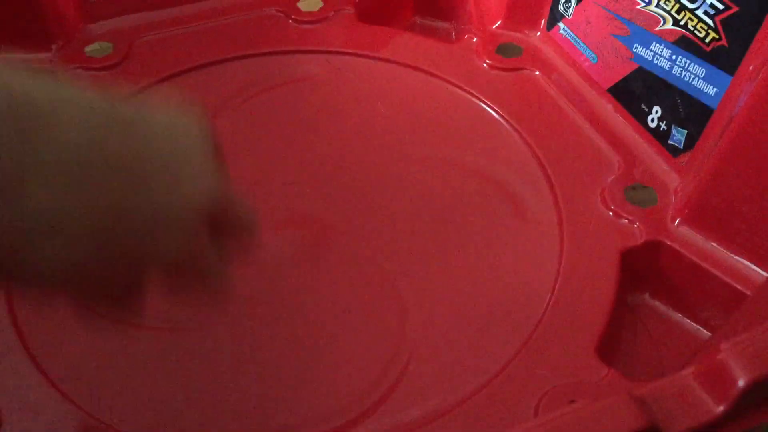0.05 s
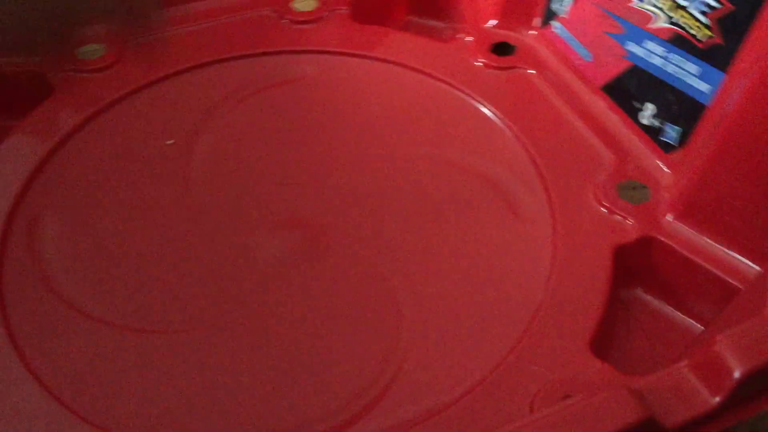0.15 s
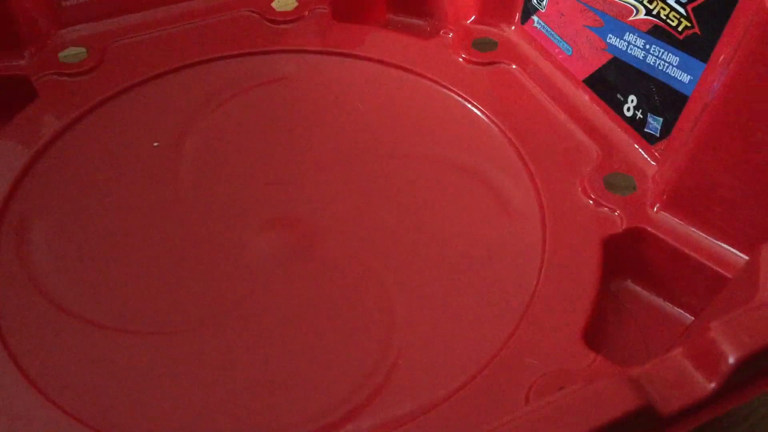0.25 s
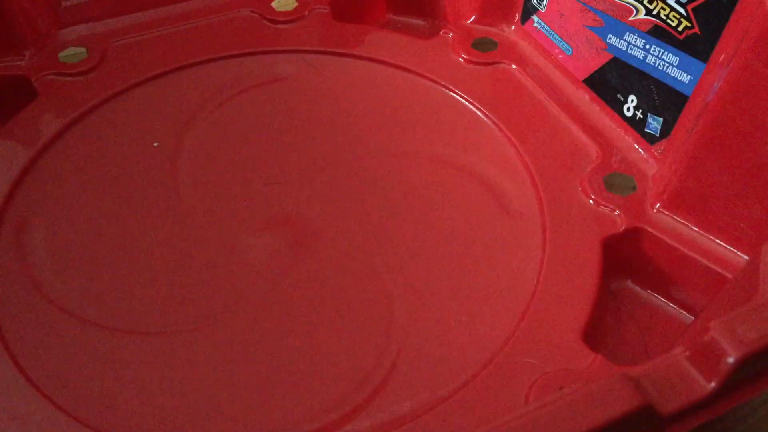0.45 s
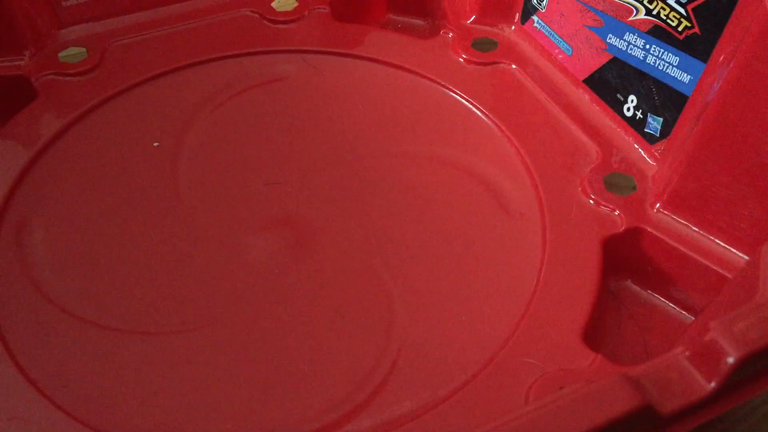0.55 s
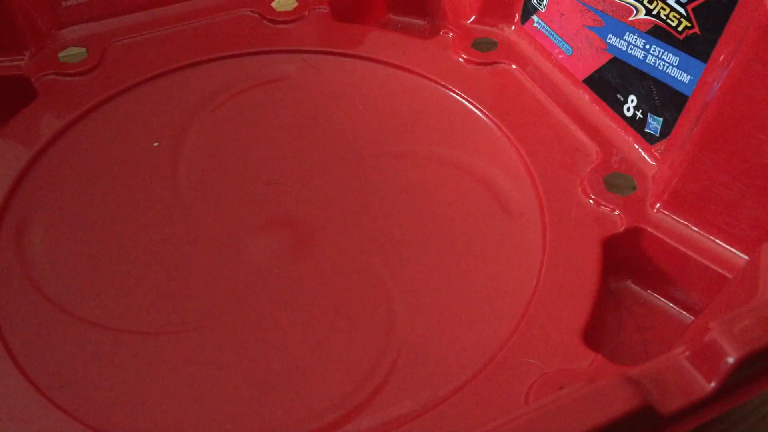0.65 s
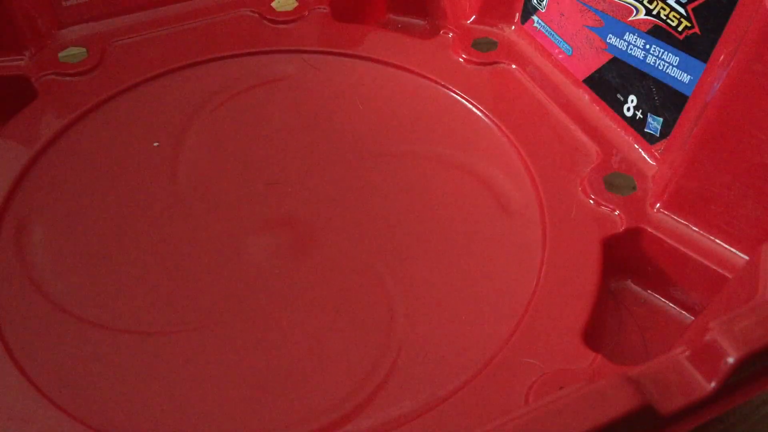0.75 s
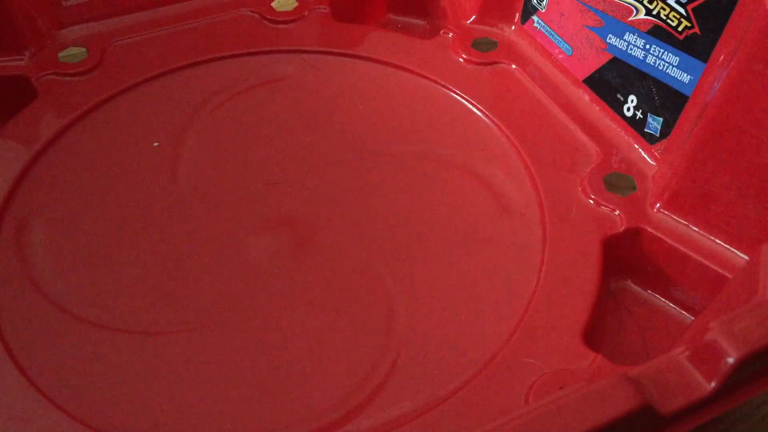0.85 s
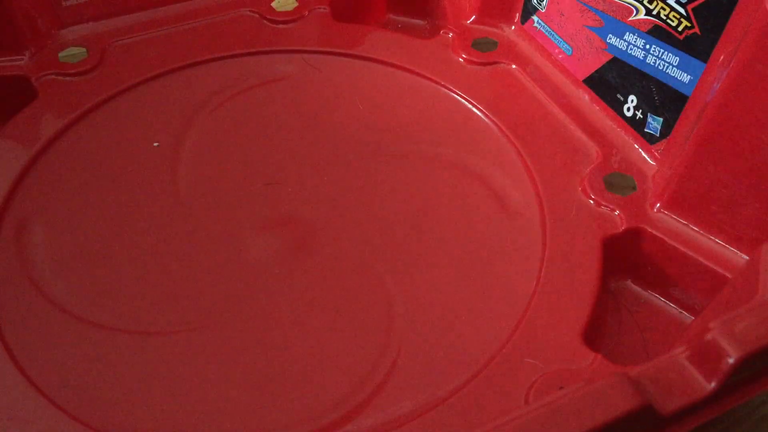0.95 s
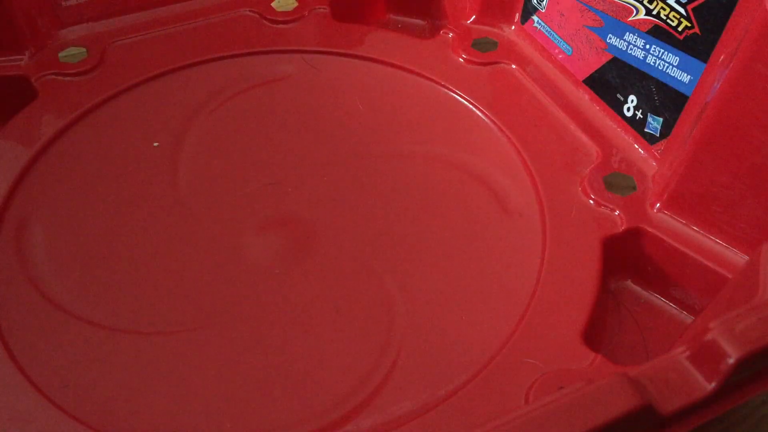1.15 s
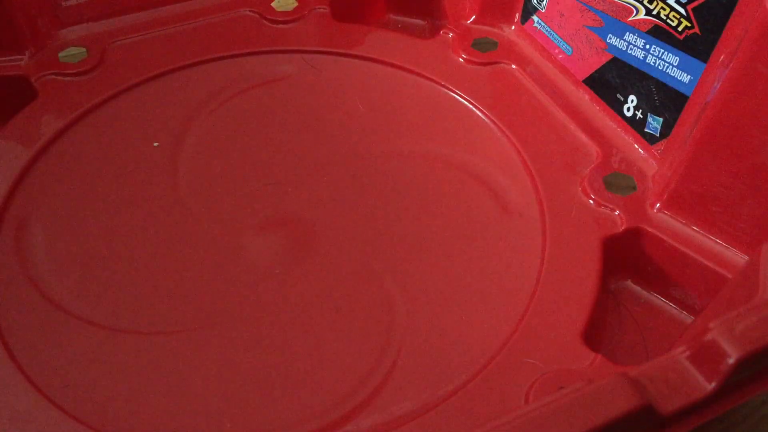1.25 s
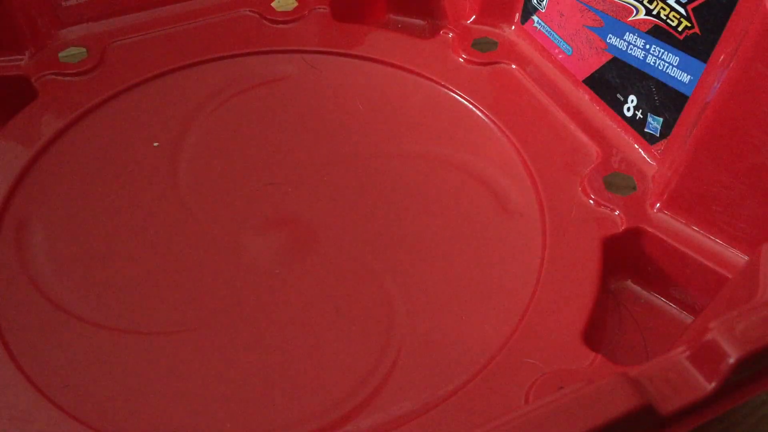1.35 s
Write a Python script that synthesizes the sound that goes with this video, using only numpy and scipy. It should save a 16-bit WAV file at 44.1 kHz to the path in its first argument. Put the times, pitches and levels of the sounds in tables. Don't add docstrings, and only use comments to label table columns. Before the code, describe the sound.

A toy spinning top scrapes and clacks on a hollow plastic arena, then small plastic parts click together

```python
import sys
import numpy as np
from scipy import signal
from scipy.fft import rfft, irfft
from scipy.io import wavfile
from scipy.ndimage import uniform_filter1d

SR = 44100
rng = np.random.default_rng(int(sys.argv[2]) if len(sys.argv) > 2 else 0)


def dump(signal):
    limited = np.clip(np.atleast_2d(signal).T, -1, 1)
    pcm = np.round(limited * 32767).astype(np.int16)
    wavfile.write(sys.argv[1], SR, pcm)


def invert_db(x):
    u = np.asarray(x, float) / 20
    return 10 ** u


N = 61739

# frequency in Hz, level in dB.
HUSH_SPECTRUM = [(90, -31), (140, -2.5), (300, -15), (1000, -15.5), (2200, -20.5), (5000, -27),
                 (16000, -37)]
# frequency in Hz, level in dB.
RUMBLE_SPECTRUM = [(20, -23.5), (45, -8), (70, 3.0), (110, -14.5), (200, -20)]
# time in seconds, level in dB.
RUMBLE_LEVEL = [(0, -43.5), (.08, -47.5), (.2, -72), (.28, -45), (.4, -53.5), (.55, -74), (.63, -58.5),
                (.72, -71.5), (1.32, -64), (1.4, -70.5)]

# time in seconds, level in dB, brightness in dB.
DRAG_LEVEL = [(0, -46, -7), (.035, -39, -15), (.075, -29, -13.5), (.095, -32.5, -18.5), (.11, -36.5, -17),
              (.16, -42.5, -25.5), (.184, -62, -5), (.21, -51, -11.5), (.216, -62.5, -10.5)]
# frequency in Hz, level in dB.
DRAG_SPECTRUM = [(100, -16.5), (230, -17), (295, 4.5), (380, -8), (530, 1.5), (803, -3.5), (1340, -2),
                 (2600, -11.5), (4500, -29)]
# frequency in Hz, level in dB.
HISS_SPECTRUM = [(3000, -22.0), (4200, 1.5), (5400, -4.5), (7200, -1.5), (10000, -9.5), (15500, -13.5)]
# start in seconds, level in dB, brightness in dB, contact in seconds.
RIDGE_CATCHES = [(0.0274, -36.5, 0, .004), (0.0472, -24, -17.5, .003), (.0523, -27, -5.5, .003),
                 (0.066, -24, -15, .003), (0.074, -24.5, -14, .003), (.083, -26.5, -14, .005),
                 (.092, -29.5, -13, .004), (0.102, -35, -14, .004), (0.1288, -34.5, -8.5, .007),
                 (0.175, -48.5, -2.5, .004), (0.182, -52, 2.5, .008), (0.194, -52, 2.5, .008)]
# frequency in Hz, level in dB.
SMALL_PART_RADIATION = [(300, -62.5), (800, -5.5), (1500, -4), (17000, -1.5)]

# start in seconds, level in dB, push in seconds.
SHELL_PUSHES = [
    (0.2144, -3.5, 0.002),
    (0.227, -17, 0.0012),
    (0.2629, 5, 0.00043),
    (0.2909, -18.5, 0.00086),
    (0.319, -48, 0.00043),
    (0.337, -19, 0.00031),
    (0.3597, -26.5, 0.00013),
    (.408, -33, 0.00073),
]
# frequency in Hz, level in dB, T60 in seconds.
SHELL_MODES = [(104, -19.5, 0.12), (158.3, -20.5, 0.15), (237.8, -13.5, 0.08), (314, -11.5, 0.066),
               (362.5, -7, 0.049), (552, 0.5, 0.045), (701.5, -4, 0.046), (792, -8, 0.035),
               (904, 6.5, 0.018), (1133, -15.5, 0.061), (1197, -12, 0.049), (1318, -16, 0.059),
               (1691, -15.5, 0.043), (2290, -7.5, 0.023)]

# start in seconds, level in dB, metal ring level in dB, contact in seconds.
ARENA_KNOCKS = [
    (0.2155, -5.5, -14, 0.0038),
    (0.2624, -6.5, -26, 0.0053),
    (0.2906, -16, -21, .006),
    (.3174, -29, -38.5, 0.008),
    (0.3595, -35.5, -34, 0.0069),
]
# frequency in Hz, level in dB, T60 in seconds.
METAL_RING_MODES = [(4899, -21.5, 0.36), (6200, -7, 0.016), (8140, -6.5, 0.027), (7960, -15.5, 0.059),
                    (9050, -14, .07), (9100, -5, 0.025), (9800, -18, .06), (11300, -12.5, .03),
                    (11590, -12, 0.21), (11400, -16.5, .06), (12600, -12.5, 0.083), (13700, -21, .04)]
# frequency in Hz, level in dB.
CRACK_SPECTRUM = [(150, -41), (500, -23.5), (1500, -3), (3000, 2.5), (5000, -5.5), (6200, 2), (7400, -4.5),
                  (9000, -3), (16000, -13)]

# time in seconds, level in dB.
RATTLE_LEVEL = [(.28, -34), (.36, -48), (.43, -52.5), (.47, -64), (.51, -55), (.56, -55), (.59, -85),
                (.7, -64)]
# frequency in Hz, level in dB.
RATTLE_SPECTRUM = [(100, -19), (300, -8), (1000, -10), (2200, -1.5), (3100, -20.5), (3900, -5.5),
                   (4800, -20.5), (16000, -33.5)]
# start in seconds, level in dB, upper band level in dB, contact in seconds.
LOOSE_TICKS = [(0.4087, -28.5, -7, 0.0046), (0.4347, -36.5, 1.7, 0.0031), (0.441, -36.5, 0.3, .002),
               (0.4439, -31, 6.5, 0.004), (0.46, -43, -0.5, .006), (0.4795, -41, -5, .003),
               (.492, -38.5, 0.6, .003), (0.4987, -36, 4, 0.003), (0.509, -32.5, 1.5, 0.004),
               (0.5265, -36, 2.5, 0.005), (0.5407, -40, -1.5, .004), (0.55, -40.5, -1.5, .008),
               (0.573, -27.5, -16, .002)]
# frequency in Hz, level in dB.
TICK_LOW_SPECTRUM = [(700, -21.5), (1600, -3), (2300, 2.5), (2800, -4), (3200, -39), (16000, -41)]
TICK_HIGH_SPECTRUM = [(3000, -27.5), (3600, 1.5), (4200, -6.5), (4800, -20), (12000, -21), (16000, -38.5)]

# time in seconds, level in dB.
RUB_LEVEL = [(.4, -48.5), (.48, -53.5), (.56, -53), (.68, -71), (.77, -76), (.8, -61), (.86, -52),
             (.89, -56.5), (.91, -87)]
# frequency in Hz, level in dB.
RUB_SPECTRUM = [(59, -34.5), (110, -10.5), (165, -2.5), (350, -4.5), (520, -10.5), (788, -13), (1030, -9.5),
                (1600, -34), (3520, -68)]

# start in seconds, level in dB, brightness in dB, lean to upper modes in dB,
# contact in seconds.
PART_CLICKS = [
    (0.6884, -51.5, -8.5, -5.5, 0.0028),
    (0.724, -57.5, -1.5, -2.2, 0.005),
    (0.7331, -22, -32.5, 1.5, 0.003),
    (0.7765, -60, -8.5, -0.7, 0.0059),
    (0.8139, -47, -12, 0.5, 0.0057),
    (0.8242, -29.5, -23.5, 1, 0.0057),
    (.8474, -39.5, -21, 2, 0.0063),
]
# start in seconds, level in dB, brightness in dB,
# lean to upper modes in dB, contact in seconds.
MORE_PART_CLICKS = [(0.9084, -23, -13.5, -5.5, 0.0044), (0.92, -7.5, -11.5, 2, 0.0033),
                    (0.923, -15, -7.5, -4.7, .003), (0.9302, -29, -18.5, 5, 0.002),
                    (.936, -32.5, -24, -10, 0.0014), (.9395, -26, -33, 9, .003), (0.9448, -20.5, -30, 5, 0.003),
                    (0.951, -35, -27.5, 5, .002), (0.9838, -21.5, -19.5, -2, 0.0021),
                    (0.9925, -21.5, -16, -4, 0.0029), (.9974, -30, -6.5, -3, 0.0027),
                    (1.0167, -38.5, -9.5, -3, 0.0054), (1.0292, -6, -18, 0.8, 0.003),
                    (1.0322, -9.5, -8.5, -1, 0.0043), (1.039, -21, -14, -3.6, .0015),
                    (1.0492, -24.5, -26, 2.5, 0.0014), (1.053, -25, -18.5, -7, .002),
                    (1.067, -33, -14, -2, 0.0029), (1.081, -37, 0, 2, .004), (1.0978, -25, -12, -2, 0.0033),
                    (1.1264, -36, -8, 1.5, 0.0051), (1.132, -41, -8.5, 3, 0.0097),
                    (1.2114, -39.5, -5.5, -2.5, 0.003)]
# time in seconds, level in dB.
CHATTER_LEVEL = [(.72, -68.5), (.8, -64), (.86, -65), (.9, -52.5), (.93, -41), (.97, -50.5), (1.02, -47.5),
                 (1.05, -40.5), (1.14, -50), (1.2, -61.5)]
# frequency in Hz, level in dB, T60 in seconds.
PART_MODES = [(854, -28.5, 0.01), (1330, -22, 0.012), (1550, -20.5, 0.013), (1800, -18, 0.029),
              (1962, -2.5, 0.03), (2105, 3, .025), (2150, 1, 0.01), (2540, 4, 0.021), (2607, 3.5, 0.022),
              (2830, -13, 0.0049), (3460, -1.5, 0.0085), (3601, -7, 0.054), (3820, -13, 0.012),
              (4330, -19.5, 0.01)]
PART_TREBLE_MODES = [(6500, -11, 0.0017), (6930, 7.5, 0.0018), (7140, -10, 0.002), (8720, -7, 0.0022),
                     (10750, -2, 0.0016)]
# frequency in Hz, level in dB.
PART_ROLLOFF = [(100, 0), (4200, 0), (5200, -14), (16000, -30)]

# frequency in Hz, T60 in seconds.
ROOM_DECAY = [(100, 0.59), (400, 0.21), (1500, 0.27), (4000, .22), (12000, 0.099)]


def evened(x):
    return x / np.sqrt(np.mean(x ** 2) + 1e-20)


def colour(x, points):
    f, value = np.transpose(points)
    hz = np.fft.rfftfreq(len(x), 1 / SR)
    gain_db = np.interp(np.log(hz + 1), np.log(f + 1), value, -90, -90)
    return irfft(rfft(x) * invert_db(gain_db), len(x))


def follow(rows, index=1):
    rows = np.array(rows)
    return np.interp(np.arange(N) / SR, rows[:, 0], rows[:, index], rows[0, index] - 20, -120)


def ring(drive, modes, rise_cycles=0.0073):
    t = np.arange(SR // 2) / SR
    body = np.zeros(len(t))
    for hz, db, t60_s in modes:
        decay = invert_db(db - 60 * t / max(t60_s, .002))
        swell = 1 - np.exp(-t * hz / rise_cycles)
        body += decay * swell * np.sin(2 * np.pi * hz * t)
    return signal.fftconvolve(drive, body)[:N]


def contacts(rows, gains_db, spread_db):
    out, t = np.zeros(N + 800), np.arange(800) / SR
    luck = rng.random((len(rows), 800, 3))
    for row, db, (gate, size, sign) in zip(rows, gains_db, luck.transpose(0, 2, 1)):
        start_s, contact_s = row[0], row[-1]
        ticks = (gate < .25) * np.sign(sign - .5) * invert_db(spread_db * (size - 1))
        ticks[0] = 0.3
        shape = invert_db(-5.0 * t / contact_s - 2800 * np.maximum(t - contact_s, 0))
        at = round(start_s * SR)
        out[at:at + 800] += ticks * shape * invert_db(db)
    return out[:N]


def grains(per_s, spread_db):
    size = invert_db(spread_db * np.minimum(rng.exponential(1, N), 4))
    size = size * rng.choice([-1., 1.], N)
    return evened(size * (rng.random(N) < per_s / SR))


def floor():
    hush = evened(colour(rng.standard_normal(N), HUSH_SPECTRUM))
    rumble = evened(colour(rng.standard_normal(N), RUMBLE_SPECTRUM))
    return invert_db(-69) * hush + rumble * invert_db(follow(RUMBLE_LEVEL))


def drag():
    slips, rows = grains(4000, spread_db=4.5), np.array(RIDGE_CATCHES)
    shell = evened(ring(slips, SHELL_MODES))
    body = evened(evened(colour(slips, DRAG_SPECTRUM)) + 0.04 * shell)
    hiss = evened(colour(slips, HISS_SPECTRUM))
    scrape = invert_db(follow(DRAG_LEVEL)) * (body + hiss * invert_db(follow(DRAG_LEVEL, index=2)))
    low = colour(contacts(rows, rows[:, 1], spread_db=8), DRAG_SPECTRUM)
    high = colour(contacts(rows, rows[:, 1] + rows[:, 2], spread_db=6), HISS_SPECTRUM)
    return scrape + colour(low, SMALL_PART_RADIATION) * invert_db(21) + high * invert_db(14)


def thuds():
    push = np.zeros(N)
    for start_s, db, push_s in SHELL_PUSHES:
        shape = np.sin(np.pi * np.clip((np.arange(200) + .5) / SR / push_s, 0, 1))
        push[round(start_s * SR):][:200] += invert_db(db) * shape / shape.sum()
    return ring(push, SHELL_MODES, rise_cycles=4)


def knocks():
    flutter_db = 5
    rows = np.array(ARENA_KNOCKS)
    out = colour(contacts(rows, rows[:, 1], spread_db=7.5), CRACK_SPECTRUM) * invert_db(7.5)
    drive = contacts(rows, rows[:, 1] + rows[:, 2], spread_db=4.5)
    drive += grains(150, spread_db=3) * invert_db(follow(RATTLE_LEVEL) - 23)
    for mode in METAL_RING_MODES:
        turn = uniform_filter1d(uniform_filter1d(rng.standard_normal(N), size=300), size=300)
        out += ring(drive, [mode]) * invert_db(flutter_db * np.clip(evened(turn), -3, 1) - 12)
    return out


def lift():
    start_s, length_s = .266, .04
    low_hz, high_hz, level_db = 215, 366, -16
    part = np.clip((np.arange(N) / SR - start_s) / length_s, 0, 1)
    hz = low_hz + (high_hz - low_hz) * part ** 1.5
    swell = np.sin(np.pi * part ** 0.67) ** 1.1
    return invert_db(level_db) * swell * np.sin(2 * np.pi * np.cumsum(hz) / SR)


def rattle():
    fine = colour(grains(5000, spread_db=3.5), RATTLE_SPECTRUM)
    sway = evened(uniform_filter1d(rng.standard_normal(N), size=300))
    lumps = invert_db(9.0 * np.tanh(sway))
    rows = np.array(LOOSE_TICKS)
    low = colour(contacts(rows, rows[:, 1], spread_db=8), TICK_LOW_SPECTRUM)
    high = colour(contacts(rows, rows[:, 1] + rows[:, 2], spread_db=8.5), TICK_HIGH_SPECTRUM)
    return invert_db(follow(RATTLE_LEVEL)) * evened(fine * (1 + .5 * lumps)) + (low + high) * invert_db(10)


def rub():
    return invert_db(follow(RUB_LEVEL)) * evened(colour(grains(1700, spread_db=4.0), RUB_SPECTRUM))


def clicks():
    grip_share = 0.018
    upper_hz = 2700
    rows = np.array(PART_CLICKS + MORE_PART_CLICKS)
    top = contacts(rows, rows[:, 1] + rows[:, 2], spread_db=4) * invert_db(-8.5)
    body = np.zeros(N)
    for k in range(3):
        held = np.array(PART_MODES) * [1 + grip_share * (k - 1), 1, 1]
        some = rows[k::3]
        chatter = grains(400, spread_db=2.0)
        chatter *= invert_db(follow(CHATTER_LEVEL) - 6.5) / np.std(ring(chatter, held, rise_cycles=0.41))
        upper = abs(held[:, 0] - upper_hz) < upper_hz / 8
        for modes, lean in ((held[upper], 1), (held[~upper], -1)):
            hits = contacts(some, some[:, 1] + lean * some[:, 3], spread_db=14.5) * invert_db(-19.5)
            body += ring(hits + chatter, modes, rise_cycles=0.5)
        top = top + chatter * invert_db(-4)
    body = colour(body, PART_ROLLOFF)
    treble = ring(top, PART_TREBLE_MODES) + colour(top, CRACK_SPECTRUM) * invert_db(-5.0)
    return colour(body + treble, SMALL_PART_RADIATION)


def room(x):
    taps = np.zeros(SR // 2)
    at = np.arange(200, len(taps) - 20, 20)
    taps[at + rng.integers(0, 20, len(at))] = rng.choice([-1., 1.], len(at))
    hz, t, z = signal.stft(taps, SR, nperseg=256)
    f, t60_s = np.transpose(ROOM_DECAY)
    decay = invert_db(-60 * t / np.interp(hz, f, t60_s)[:, None])
    tail = signal.istft(z * decay, SR, nperseg=256)[1]
    return signal.fftconvolve(x, tail / np.linalg.norm(tail))[:N]


def scene():
    near = drag() + thuds() + knocks() + lift() + rattle() + rub() + clicks()
    return (near + invert_db(-13) * room(near) + floor())[None]


def band_limit(x):
    return signal.sosfilt(signal.butter(12, 16800, fs=SR, output="sos"), x)


def record(dry):
    lowpass = signal.firwin(255, 15800, window=("kaiser", 9), fs=SR)
    mix = signal.oaconvolve(np.tanh(dry), lowpass[None], "same")
    return band_limit(mix)


dry = scene()
out = record(dry)
dump(out)
```